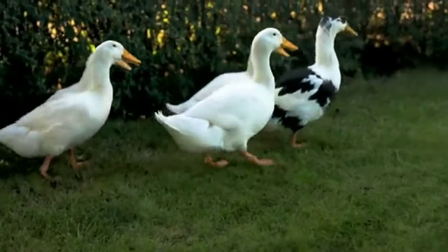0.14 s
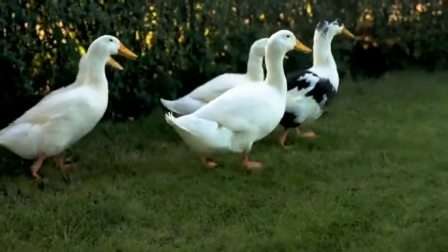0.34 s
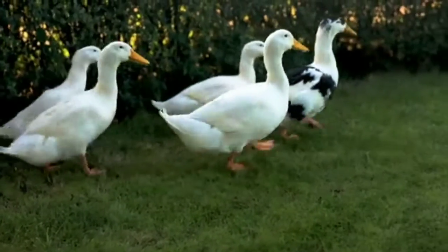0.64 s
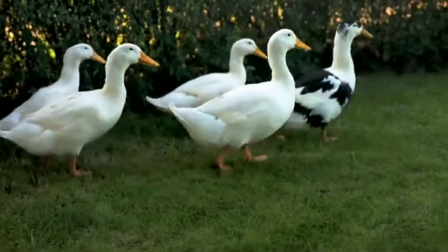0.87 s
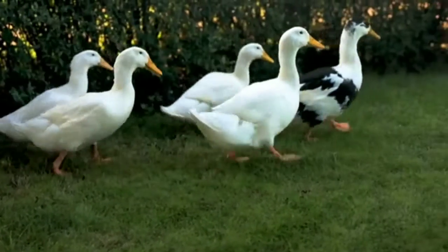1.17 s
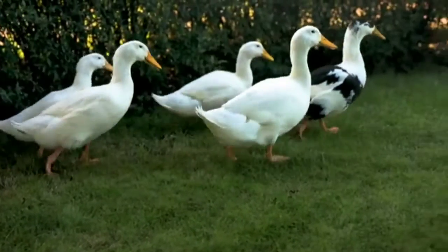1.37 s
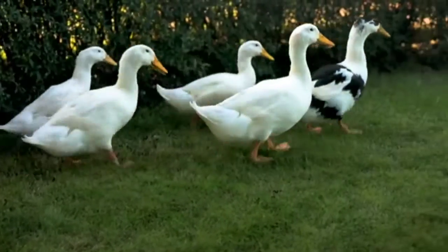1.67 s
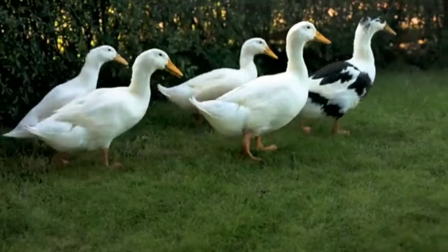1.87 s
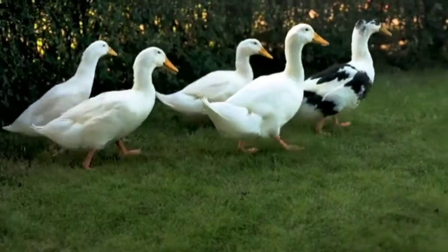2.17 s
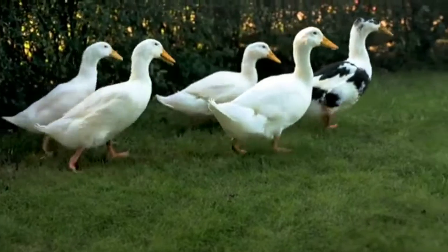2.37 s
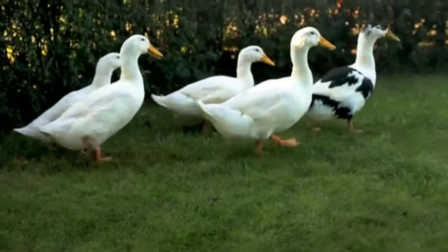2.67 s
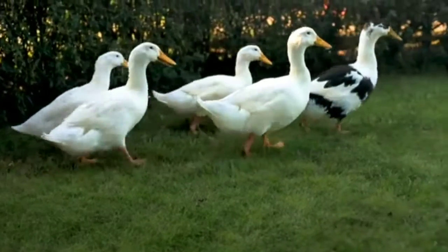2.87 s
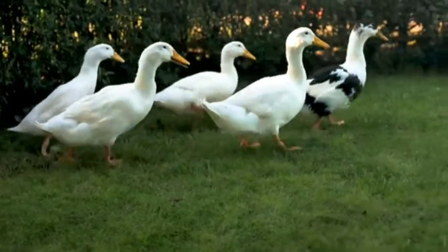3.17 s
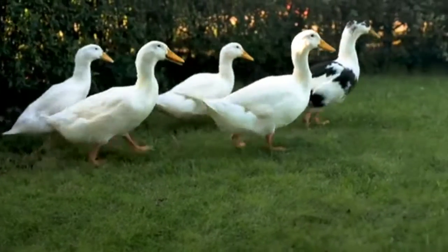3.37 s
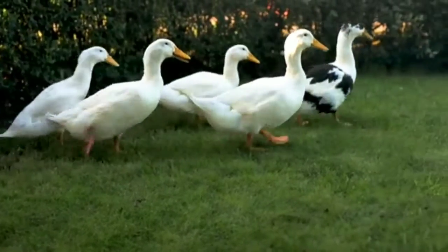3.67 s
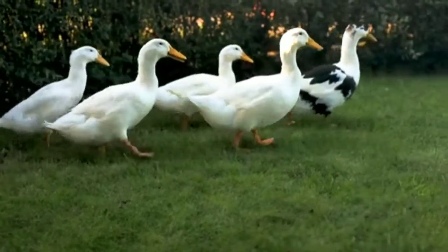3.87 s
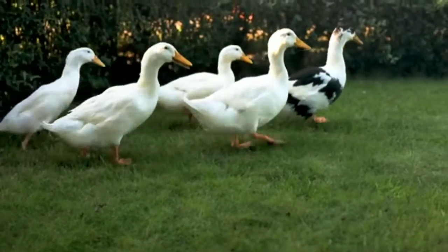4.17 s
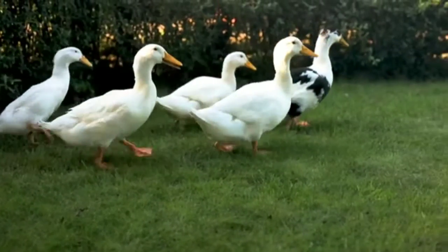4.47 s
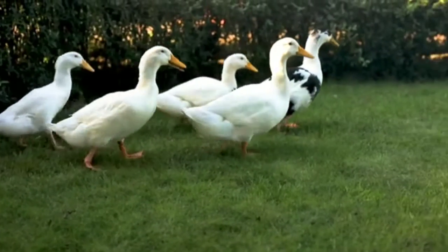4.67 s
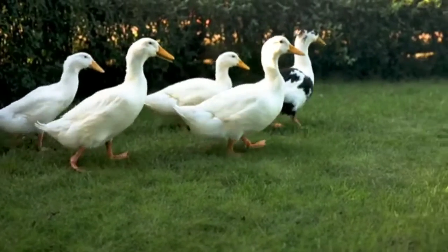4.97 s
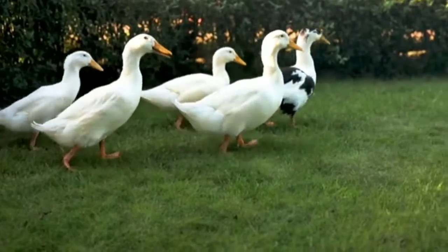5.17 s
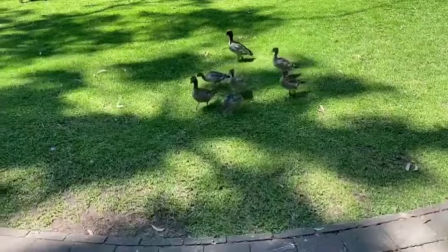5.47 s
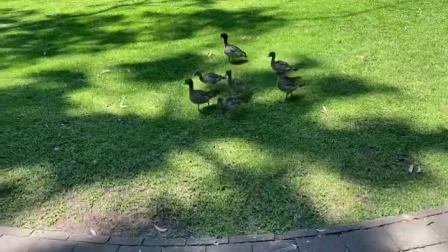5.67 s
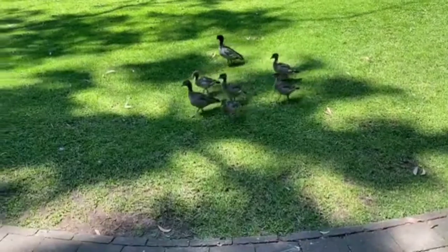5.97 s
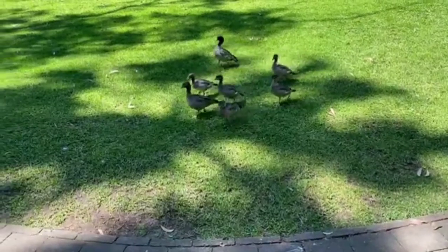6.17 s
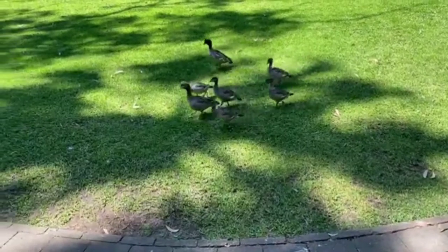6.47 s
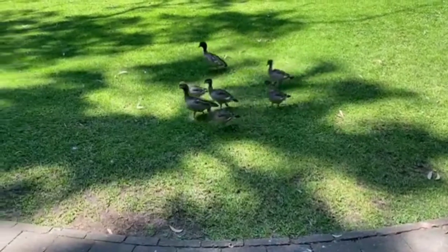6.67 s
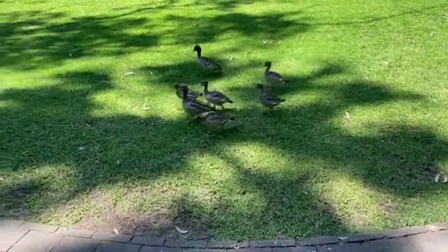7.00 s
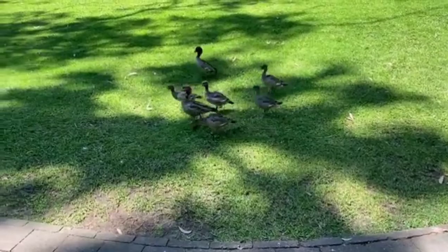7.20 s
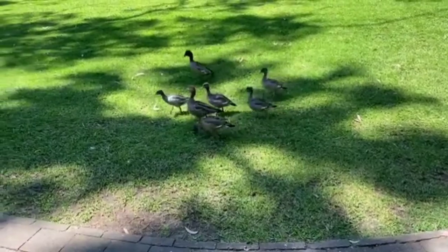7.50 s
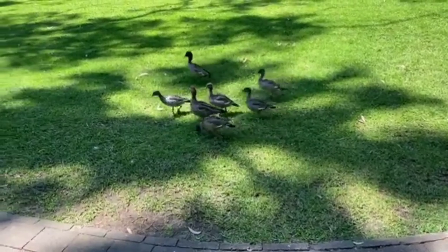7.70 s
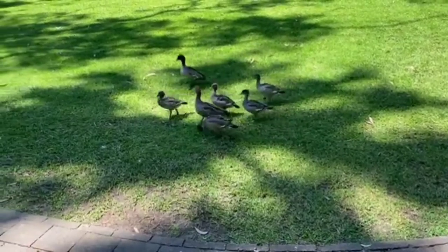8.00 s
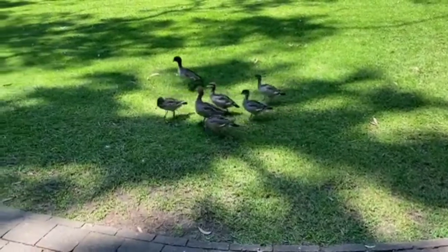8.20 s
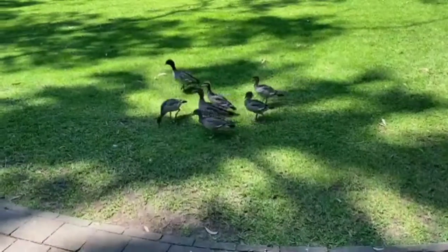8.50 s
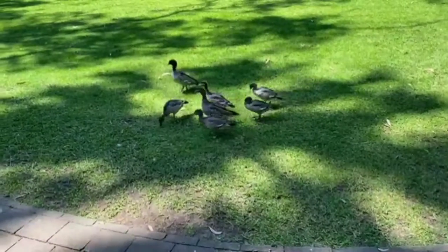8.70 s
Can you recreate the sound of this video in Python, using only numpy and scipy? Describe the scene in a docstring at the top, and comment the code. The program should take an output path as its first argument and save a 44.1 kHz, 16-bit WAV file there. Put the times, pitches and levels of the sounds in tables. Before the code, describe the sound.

Ducks call across grass, heard by two microphones a head's width apart. Single quacks, one mellow and others hoarse and nasal, are separated by quiet clucks, dry ticks and faint arched whistles. Midway feathers rustle on the left with soft thudding steps and tiny peeps; then quacks repeat about every half second, more distant and echoing, before gentle footfalls finish it.

```python
"""Ducks quack, hoarse and mellow, on a lawn in a walled yard, with two microphones a head's width apart.
Each quack is a train of syrinx pulses ringing in bill, chest and throat; diffuse decaying noise is the walls' echo.
Between quacks: pulsed clucks, arched whistles and a short high snap, feet as decaying rings with noisy slaps,
dry noise ticks, a small creature's sliding peeps, and feathers rustling as patchy noise.
Behind them: distant outdoor noise, a thin treble fizz and a low, fuzzy hum."""
import sys
import numpy as np
from scipy import signal
from scipy.fft import rfft, irfft, next_fast_len
from scipy.io import wavfile
from scipy.ndimage import uniform_filter1d, map_coordinates

SR = 44100
rng = np.random.default_rng(int(sys.argv[2]) if len(sys.argv) > 2 else 0)


def pcm_store(signal):
    """Save signal as 16-bit PCM."""
    levels = np.round(np.clip(np.atleast_2d(signal), -1, 1) * 32767)
    wavfile.write(sys.argv[1], SR, levels.astype(np.int16).T)


N = 390285
LEAD_IN = SR // 2  # samples played before the start, so that an earlier quack still echoes


def amp(db):
    """Turn dB into gain."""
    return 10 ** (np.asarray(db) / 20)


def unit(x):
    """Scale a sound to rms 1."""
    return x / np.sqrt(np.mean(x ** 2) + 1e-20)


def along(points, hz):
    """Read (frequency, value) points along a log frequency axis."""
    f, v = np.transpose(points)
    return np.interp(np.log(hz + 1), np.log(f + 1), v)


def filtered(x, response):
    """Multiply the spectrum of x by a complex response of frequency."""
    m = next_fast_len(x.shape[-1] + 4096)
    spectrum = rfft(x, m) * response(np.fft.rfftfreq(m, 1 / SR))
    return irfft(spectrum, m)[..., :x.shape[-1]]


def gaussian_noise(count, width_hz):
    """Low-passed noise of rms 1."""
    return unit(filtered(rng.standard_normal(count), lambda f: np.exp(-(f / width_hz) ** 2)))


def high_pass(x, corner_hz, order):
    """Cut what lies below the corner, without shifting phase."""
    return filtered(x, lambda f: (f / corner_hz) ** order / (1 + (f / corner_hz) ** order))


def silence():
    """Two empty microphone tracks, with the lead-in before and room for tails after."""
    return np.zeros((2, LEAD_IN + N + 2 * SR))


def add(track, sound, s, pan_db, lead_ms, shadow_hz=900):
    """Place a sound: it reaches the far microphone later, and duller because the head shades only short waves."""
    half = np.array([[.5], [-.5]])  # left, right

    def head(f):
        """Level and delay at each microphone; the level difference equals pan_db at twice shadow_hz."""
        shade = amp(half * pan_db * 2 * f / (f + 2 * shadow_hz))
        delay_ms = 1 - half * lead_ms
        return shade * np.exp(-2j * np.pi * f * delay_ms / 1000)

    at = LEAD_IN + round((s - .001) * SR)  # makes up for the 1 ms in the delay
    part = track[:, at:at + len(sound) + 128]
    part += filtered(np.pad(sound, (0, 128)), head)[:, :part.shape[1]]


# each quack, and at 1.695 s a faint echo of the one before, from its place: voice, left_lead_ms,
# pitch_hz (pulse rate midway, full voice), open_bill_hz,
# then relative to the effort: chest_db, throat_db, yard_echo_db
QUACKS = [("hoarse", 0.72, 184, 2126, -8, -5, -15.5), ("mellow", -0.74, 250, 1815, -10, -18, -23.5),
          ("mellow", -0.6, 200, 1800, -27, -32, -12), ("hoarse", 0.53, 177, 2180, -25, -14, -14.5),
          ("hoarse", 0.61, 265, 2015, -18, -16, -36), ("hoarse", 0.5, 165, 2460, -19, -29, -8),
          ("hoarse", .44, 172, 2350, -25, -33, -13), ("hoarse", 0.5, 190, 2320, -32, -30, -13),
          ("hoarse", 0.51, 180, 2220, -20.5, -14, -9), ("hoarse", 0.34, 188, 2230, -19, -8, -6.5),
          ("hoarse", 0.33, 290, 2200, -17.5, -4, -0.5), ("hoarse", 0.27, 182, 2250, -25, -4, -4.5)]
# effort through each quack, and through the faint echo at 1.695 s, one list each: time_s, level_db
EFFORT = [
    [(-.22, -52), (-.15, -26), (-.01, -26)],
    [(1.522, -46.5), (1.545, -33), (1.575, -27.5), (1.586, -23), (1.601, -22.5), (1.611, -31)],
    [(1.695, -51), (1.74, -55.5)],
    [(3.612, -55.5), (3.64, -42.5), (3.664, -31.5), (3.718, -27.5), (3.8, -27), (3.842, -25.5)],
    [(4.456, -49.5), (4.468, -42), (4.495, -39), (4.508, -31), (4.59, -28.5), (4.62, -35)],
    [(5.118, -34.5), (5.158, -46), (5.18, -36.5), (5.204, -33.5)],
    [(5.212, -24.5), (5.224, -24), (5.245, -44)],
    [(5.625, -50), (5.7, -31.5), (5.712, -23), (5.728, -27), (5.74, -36), (5.778, -30.5), (5.795, -42)],
    [(6.19, -51.5), (6.21, -35.5), (6.23, -29.5), (6.27, -32.5), (6.315, -31), (6.34, -25.5),
     (6.365, -33.5), (6.39, -39.5)],
    [(6.755, -38.5), (6.787, -31.5), (6.903, -26.5), (6.959, -28), (6.98, -38.5)],
    [(7.397, -46), (7.42, -33.5), (7.442, -41.5)],
    [(7.442, -42.5), (7.46, -32.5), (7.52, -31.5), (7.56, -34), (7.582, -32.5), (7.597, -38)],
]
# the two voices: alternation_db (between neighbouring pulses), chest_hz, rasp_db (before effort),
# creak_db (this far under full voice), shut_bill_lower_hz, opens_over_db
VOICES = {"hoarse": (-1.7, 372, -14.5, 11.5, 506, 17), "mellow": (13, 287, -23, 19, 384, 4)}
# irregularity of each voice: share (no unit)
ROUGHNESS = {"hoarse": .17, "mellow": .04}
# clucks in the mellow voice: middle_s, level_db, open_bill_hz, chest_db
CLUCKS = [(2.13, -43, 1600, -11), (2.172, -37.5, 1600, -25), (2.247, -40, 1630, -27),
          (2.35, -38.5, 1720, -15), (2.394, -39.5, 1600, -25), (2.653, -30.5, 1690, -8)]
CLUCK_HALF_S, CLUCK_FADE_DB = .01, 20.5  # fade over each half
CLUCK_HZ, CLUCK_LEAD_MS = 244.2, -0.75  # pulse rate midway at full voice, left lead
PAN_DB_PER_MS, LEFT_BIAS_DB = 14, 3.5  # a lead in time brings a lead in level


def ducks():
    """All quacks and one faint echo voiced like them, each from its place with its yard tail, and the clucks."""
    out = silence()

    def call(effort, kind, lead_ms, pitch_hz, open_hz, chest_db, throat_db):
        """Voice one call and place it before the microphones."""
        alternation_db, chest_hz, rasp_db, *habits = VOICES[kind]
        rows = voicing(effort, pitch_hz, open_hz, *habits)
        voice = quack(rows, ROUGHNESS[kind], alternation_db, chest_hz, chest_db, throat_db, rasp_db)
        pan_db = PAN_DB_PER_MS * lead_ms + LEFT_BIAS_DB
        add(out, voice, effort[0][0] - .002, pan_db, lead_ms)  # each pulse starts 2 ms late
        return voice

    for effort, (*caller, echo_db) in zip(EFFORT, QUACKS):
        voice = call(effort, *caller)
        echo = amp(echo_db) * signal.fftconvolve(voice[None], yard_tail(), axes=1)
        start = LEAD_IN + round(effort[0][0] * SR)
        out[:, start:][:, :echo.shape[1]] += echo
    for s, db, open_hz, chest_db in CLUCKS:
        edge_db = db - CLUCK_FADE_DB
        effort = [(s - CLUCK_HALF_S, edge_db), (s, db), (s + CLUCK_HALF_S, edge_db)]
        call(effort, "mellow", CLUCK_LEAD_MS, CLUCK_HZ, open_hz, chest_db, throat_db=-29)
    return out[:, LEAD_IN:LEAD_IN + N]


CREAK_HZ, CREAK_SPAN_DB = 126.7, 1.5  # blown softly, the pulses slow to a creak
CLIMB = .12  # share by which the full-voice pulse rate climbs through a call
LAG_HZ, LAG_S = 370, 0.086  # the bill starts this much lower and takes this time constant to open


def voicing(effort, pitch_hz, open_hz, creak_db, shut_hz, opens_db):
    """Pulse rate and bill resonance follow the effort, while the pulses climb and the bill opens with time."""
    s, db = np.transpose(effort)
    t = np.linspace(s[0], s[-1], num=40)
    db = np.interp(t, s, db)
    short_db = db.max() - db
    full = 1 / (1 + np.exp((short_db - creak_db) / CREAK_SPAN_DB))
    voiced_hz = pitch_hz * (1 + CLIMB * np.linspace(-.5, .5, num=40))
    rate_hz = CREAK_HZ + (voiced_hz - CREAK_HZ) * full
    lag_hz = LAG_HZ * np.exp((s[0] - t) / LAG_S)
    closing_hz = shut_hz * (1 - np.exp(-short_db / opens_db))
    return np.transpose([t, db, rate_hz, open_hz - lag_hz - closing_hz])


# resonances that move with the bill: multiple (of the bill resonance), width_hz, relative_db
BILL_MODES = [(0.676, 321, -4), (0.968, 225, 0.5), (1.152, 300, -0.5)]
# a resonance that the bill does not move: hz, width_hz, relative_db
NOSTRIL_MODE = (2920, 800, -3.5)
# colour of the hiss in each pulse: hz, relative_db (per Hz)
RASP_COLOUR = [(1880, 5.5), (3200, -4), (4930, -7.5), (5340, -7.5), (7320, -10), (8650, -19.5),
               (13000, -31), (14000, -43)]
GROUND_MS, GROUND_DB = 2.658, -18  # the lawn returns each pulse later and softer
DOUBLING_POWER, MODE_SCATTER_DB = 3, 4  # scatter is multiplied by roughness
RING_SAMPLES = 1200  # length kept of each pulse


def quack(rows, rough, alternation_db, chest_hz, chest_db, throat_db, rasp_db):
    """Every pulse rings the bill at its present opening, thumps chest and throat and spits a burst of hiss."""
    s, *cols = np.transpose(rows)
    t = s[0] + np.arange(round((s[-1] - s[0]) * SR)) / SR
    cycles = np.cumsum(np.interp(t, s, cols[1])) / SR
    pulse_s = np.flatnonzero(np.diff(np.floor(cycles + .8))) / SR
    db, rate, bill_hz = [np.interp(s[0] + pulse_s, s, c)[:, None] for c in cols]
    count = len(pulse_s)
    luck = rng.standard_normal((count, 6))
    ring = np.arange(RING_SAMPLES) / SR

    effort = amp(db - db.max())
    rough = rough * (0.47 + 0.71 * effort ** .5)  # soft pulses are the cleanest
    odd = np.arange(count)[::-1, None] % 2
    # hard blowing makes strong and weak pulses alternate
    alternate_db = alternation_db * effort ** DOUBLING_POWER * (odd - .5)
    size = amp(db + 2.9 * rough * luck[:, :1] + alternate_db) / np.sqrt(rate)

    # uneven closing of the membranes shifts each pulse
    late = np.clip(ring - .002 - 0.214 * rough * luck[:, 1:2] / rate, 0, None)
    swell = (1 - np.exp(-late / 0.00066)) ** 2  # a soft start keeps the sound inside the resonances
    modes = [(m * bill_hz, w, g) for m, w, g in BILL_MODES] + [NOSTRIL_MODE]
    bill = 0
    for k, (hz, width_hz, mode_db) in enumerate(modes):
        gain = amp(mode_db + MODE_SCATTER_DB * rough * luck[:, 2 + k:3 + k] + 36)
        bill = bill + (-1) ** k * gain * np.exp(-np.pi * width_hz * late) * np.sin(2 * np.pi * hz * late)
    turbulence = gaussian_noise((count, RING_SAMPLES), 700)
    # turbulence breaks up the ring after the front
    bill *= swell * (1 + 5.7 * rough * turbulence * np.clip(late / 0.0045, 0, 1))

    even = np.clip(ring - .002 - 0.14 * rough * luck[:, 1:2] / rate, 0, None)  # the body is less uneven
    body = 0
    for hz, width_hz, mode_db in [(chest_hz, 170, chest_db), (2.05 * chest_hz, 320, throat_db)]:
        gain = amp(db + mode_db + 41 + 14.7 * rough * luck[:, 2:3]) / np.sqrt(rate)
        thump = np.exp(-np.pi * width_hz * even) * (1 - np.exp(-even / 0.0027))
        body = body + gain * thump * np.sin(2 * np.pi * hz * even)

    noise = rng.standard_normal((count, RING_SAMPLES))
    hiss = unit(filtered(noise, lambda f: amp(along(RASP_COLOUR, f))))
    spit = amp(rasp_db + 36) * effort ** 0.32 * hiss * swell * np.exp(-late / 0.004)

    # lay the overlapping pulses on one time line
    where = (np.round(pulse_s * SR).astype(int)[:, None] + np.arange(RING_SAMPLES)).ravel()
    beak = high_pass(np.bincount(where, (size * (bill + spit)).ravel()), 800, 4)
    voice = beak + high_pass(np.bincount(where, body.ravel()), 190, 6)
    return filtered(voice, lambda f: 1 + amp(GROUND_DB) * np.exp(-2j * np.pi * f * GROUND_MS / 1000))


# how long the walled yard rings: hz, t60_s
YARD_DECAY = [(300, 2), (1200, 1.03), (2200, 0.96), (4000, 0.76), (8000, 0.93), (14000, 0.054)]
YARD_LOW_HZ = 1150  # lower sounds find little to bounce off
RING_HZ, RING_WIDTH_HZ, RING_DB = 3150, 100, 1.67  # a band that the yard lifts


def yard_tail():
    """A fresh pair of diffuse echoes; each frequency dies at its own speed."""
    hz, t, z = signal.stft(rng.standard_normal((2, SR)), SR, nperseg=256)
    swell = 1 - np.exp(-t / 0.0026)
    lift = amp(RING_DB * np.exp(-((hz - RING_HZ) / RING_WIDTH_HZ) ** 2))
    colour = lift * hz ** 2 / (hz ** 2 + YARD_LOW_HZ ** 2)
    decay = amp(-60 * t / along(YARD_DECAY, hz)[:, None])
    tail = signal.istft(z * swell * decay * colour[:, None], SR, nperseg=256)[1]
    return tail / np.linalg.norm(tail[0])


# where the small sounds come from: time_s, left_louder_db (at twice the shadow frequency)
FLOCK_PLACE = [(3.2, 1), (4.5, 13), (6.2, 7), (7.2, 4.5), (8.2, 2.5)]


def nearby(track, sound, s):
    """Place a sound where the flock is at that moment; the louder microphone also hears it first."""
    pan_db = np.interp(s, *np.transpose(FLOCK_PLACE))
    add(track, sound, s, pan_db, 0.068 * pan_db)


# soft whistles whose pitch arches, and at 4.614 s a short high snap: middle_s, length_s, top_hz, level_db
WHISTLES_AND_SNAP = [(1.103, 0.08, 1850, -55), (1.438, .03, 1560, -48.5), (1.451, 0.07, 1086, -44),
                     (2.272, 0.052, 1055, -42.5), (2.366, 0.068, 980, -52), (2.426, 0.05, 1456, -47.5),
                     (2.472, 0.048, 933, -47), (2.585, 0.075, 1026, -48.5), (2.612, 0.068, 1730, -52.5),
                     (2.69, 0.096, 1990, -58), (3.195, 0.067, 1750, -62), (3.486, 0.071, 707, -51.5),
                     (4.614, 0.0071, 3730, -35.5), (4.742, 0.014, 1810, -38), (4.87, .02, 1427, -45),
                     (5.013, .025, 1885, -49.5), (5.044, .025, 1830, -49)]
ARCH_HZ_PER_S = 5390  # longer whistles start and end further below their top
OVERTONE_MULTIPLE, OVERTONE_DB = 1.65, -9  # a breathy band above each pitch


def whistles_and_snap(out):
    """A roughened sine on an arched pitch with a breathy band above it; the snap is the same, but very short."""
    for s, length, top_hz, db in WHISTLES_AND_SNAP:
        u = np.linspace(-1, 1, round(length * SR))
        phase = 2 * np.pi * np.cumsum(top_hz - ARCH_HZ_PER_S * length * u ** 2) / SR
        hoarse = 1 + .5 * gaussian_noise(len(u), 200)
        breath = gaussian_noise(len(u), 260)
        breathy = amp(OVERTONE_DB) * breath * np.sin(OVERTONE_MULTIPLE * phase)
        nearby(out, amp(db) * (1 - u ** 2) * (hoarse * np.sin(phase) + breathy), s - length / 2)


# feet on the ground: start_s, level_db, ring_hz
PATS = [(2.124, -43, 268), (2.364, -41.5, 306), (2.425, -46, 298), (2.59, -45, 340), (3.156, -44, 362),
        (4.719, -36.5, 295), (4.819, -35.5, 314), (4.884, -40.5, 520), (4.916, -33, 331),
        (5.014, -34.5, 344), (8.035, -53, 810), (8.06, -51, 606), (8.154, -47, 804), (8.308, -51, 790),
        (8.219, -43.5, 450), (8.36, -46, 690), (8.44, -54, 633), (8.491, -41, 766), (8.548, -40.5, 714),
        (8.589, -36, 460), (8.654, -44.5, 665), (8.707, -45, 497), (8.785, -49, 347)]
PATTER_FROM_S, PATTER_TO_S, PATTER_DB = 8.0, 8.85, -51.5  # span and mean level of lighter footfalls


def footfalls(out):
    """Each foot gives a short damped thud and a noisy slap; thirty lighter ones fall at random."""
    t = np.arange(2000) / SR
    light = [(PATTER_FROM_S + (PATTER_TO_S - PATTER_FROM_S) * a, PATTER_DB + 8 * (b - .5), 400 + 900 * c)
             for a, b, c in rng.random((30, 3))]
    for s, db, hz in PATS + light:
        noise = filtered(rng.standard_normal(len(t)), lambda f: 3 / (1 + (f / (3.34 * hz)) ** 3))
        slap = 1.1 * noise * np.exp(-t / 0.0083)
        thud = np.sin(2 * np.pi * hz * t) * np.exp(-t / 0.0075)
        pat = (1 - np.exp(-t / 0.0013)) * (thud + slap)
        nearby(out, amp(db) * high_pass(pat, 220, 4), s)


# dry ticks in the treble: time_s, level_db
TICKS = [(1.183, -46), (1.49, -42), (1.919, -38), (2.267, -39), (2.4403, -27.5), (2.592, -40), (2.65, -35),
         (3.029, -45), (4.612, -35), (4.8343, -38), (8.035, -44), (8.06, -40), (8.36, -55), (8.49, -52),
         (8.5934, -35), (8.7093, -46)]


def ticks(out):
    """Bright noise that rises and dies within milliseconds."""
    t = np.arange(2000) / SR
    for s, db in TICKS:
        crackle = filtered(rng.standard_normal(len(t)), lambda f: f / (f + 1500) / (1 + (f / 16000) ** 2))
        nearby(out, amp(db) * crackle * t / 0.0012 * np.exp(-t / 0.0014), s - .001)


# a small creature, alone or in steady runs: first_s, count (rounded), apart_s,
# level_db (varied where count exceeds 1), pitch_hz (varied at each peep)
PEEPS = [(3.055, 1.2, 0, -52, 3680), (4.866, 14, .0998, -57, 4090), (7.03, 4, .1057, -54, 4070),
         (8.2, 1.2, 0, -61, 4670), (8.287, 1, 0, -48.5, 4600), (8.641, 0.79, 0, -48.5, 4900),
         (8.759, 0.91, 0, -49, 4400)]


def peeps(out):
    """Short roughened tones whose pitch slides up a little."""
    u = np.arange(round(0.022 * SR)) / SR
    for first, many, apart, db, hz in PEEPS:
        for k in range(round(many)):
            peep_db = db + rng.normal(0, 2.4) * (many > 1)
            peep_hz = hz * rng.normal(1, 0.019)
            hoarse = 1 + .6 * gaussian_noise(len(u), 250)
            tone = hoarse * np.sin(2 * np.pi * peep_hz * u * (1 + 1.0 * u))
            nearby(out, amp(peep_db) * np.hanning(len(u)) * tone, first + k * apart - .004)


def small_sounds():
    """Whistles and the snap, footfalls, ticks and peeps on one pair of tracks."""
    out = silence()
    for source in (whistles_and_snap, footfalls, ticks, peeps):
        source(out)
    return out[:, LEAD_IN:LEAD_IN + N]


def wobble(rate):
    """A smooth random curve, rate knots a second."""
    knots = rng.standard_normal(int(N * rate / SR) + 4)
    return map_coordinates(knots, [np.arange(N) * rate / SR])


# how alike the noise is at the two microphones: hz, likeness (1 = same)
LIKENESS = [(60, 1), (130, 0.79), (290, 0.39), (640, 0), (1400, 0.017)]


def rush(spectrum, patchy_db):
    """Stereo noise of rms 1 with patches of random gain; the two sides are most alike in the bass."""
    z = signal.stft(rng.standard_normal((2, N)), nperseg=512)[2]
    field = uniform_filter1d(rng.standard_normal(z.shape[1:]), 6, 0)  # smooth over frequency
    field = uniform_filter1d(field, 12, 1)  # and over time
    pair = signal.istft(z * amp(patchy_db * unit(field)), nperseg=512)[1][:, :N]

    def mid_side(hz):
        """Share the power so that left and right reach the wanted likeness."""
        turn = np.arccos(np.clip(along(LIKENESS, hz), -1, 1)) / 2
        return amp(along(spectrum, hz)) * [np.cos(turn), np.sin(turn)]

    mid, side = filtered(pair, mid_side)
    return unit(np.array([mid + side, mid - side]))


# colour of the feathers: hz, relative_db (per Hz)
RUSTLE_COLOUR = [(410, -48), (700, -11), (828, -18.5), (1830, -0.5), (2430, -7.5), (12400, -27.5),
                 (15500, -32)]
SHAKE_S, SHAKE_DB, SETTLE_DB_PER_S = 4.58, -41, 21.5  # start, level midway between sides, settling


def feathers():
    """Feathers shaken on the left, then settling: flickering patchy noise."""
    t = np.arange(N) / SR
    shake_db = np.where(t > SHAKE_S, SHAKE_DB - SETTLE_DB_PER_S * (t - SHAKE_S), -120)
    flicker = amp(3.5 * wobble(20) + 2.3 * wobble(400))
    rustle = unit(flicker * rush(RUSTLE_COLOUR, patchy_db=-0.4))
    return amp(shake_db + [[4], [-4]]) * rustle


# background level through the scene, before its wavering: time_s, outdoors_db, fizz_db (midway between sides)
AIR_LEVELS = [(0.0, -55, -79.5), (2.71, -55, -65), (4.51, -56.5, -107), (4.66, -52, -85), (5.52, -53, -82),
              (8.85, -54.5, -77)]
# colour of the distant noise: hz, relative_db (per Hz)
OUTDOORS_COLOUR = [(20, -25), (60, -18.5), (140, -11), (185, -8.5), (230, -7.5), (350, -8.5), (600, -9.5),
                   (1000, -7), (3850, -15.5), (5850, -26.5), (15500, -36.5)]
# colour of the thin fizz: hz, relative_db (per Hz)
FIZZ_COLOUR = [(5000, -18), (9000, -4), (12500, 2.5), (15500, -2.5)]


def air():
    """Distant noise wavers slightly; a thin fizz, louder on the right, comes and goes in the treble."""
    t = np.arange(N) / SR
    s, far_db, fizz_db = np.transpose(AIR_LEVELS)
    far_gain = amp(np.interp(t, s, far_db) + 0.76 * wobble(24))
    fizz_gain = amp(np.interp(t, s, fizz_db) + 1.5 * wobble(29.44) + [[-2.5], [2.5]])
    far = far_gain * rush(OUTDOORS_COLOUR, patchy_db=.5)
    return far + fizz_gain * rush(FIZZ_COLOUR, patchy_db=1)


# level of the low, fuzzy hum: time_s, level_db
HUM_LEVELS = [(0, -76), (2.6, -75), (3.1, -66.5), (4.0, -72.5), (8.85, -72.5)]
HUM_HZ = 188.6


def hum():
    """Noise in a narrow band, the same at both microphones: a tone that wavers."""
    noise = rng.standard_normal(N)
    band = unit(filtered(noise, lambda f: np.exp(-((f - HUM_HZ) / 14) ** 2)))
    return amp(np.interp(np.arange(N) / SR, *np.transpose(HUM_LEVELS))) * band


def scene():
    """Everything that reaches the two microphones."""
    return ducks() + small_sounds() + feathers() + air() + hum()


TOP_HZ = 15500  # band limit


def record(dry):
    """Nothing is kept above the band limit."""
    return filtered(dry, lambda hz: hz < TOP_HZ)


dry = scene()
out = record(dry)
pcm_store(out)
```